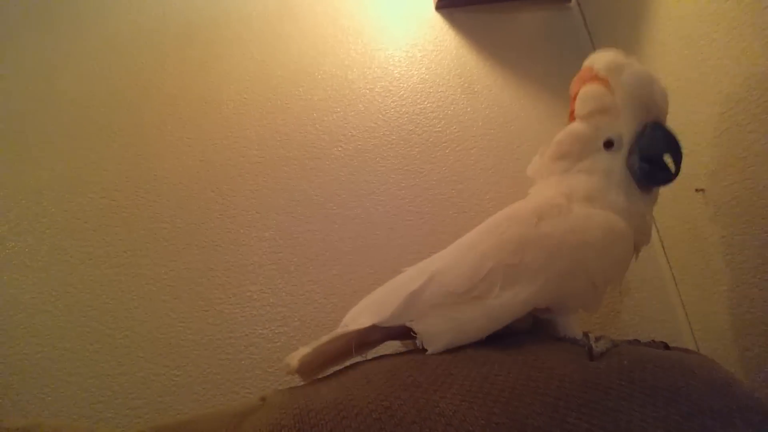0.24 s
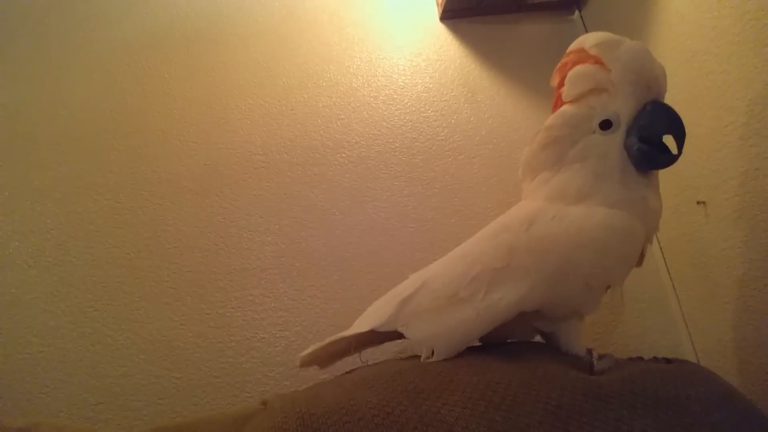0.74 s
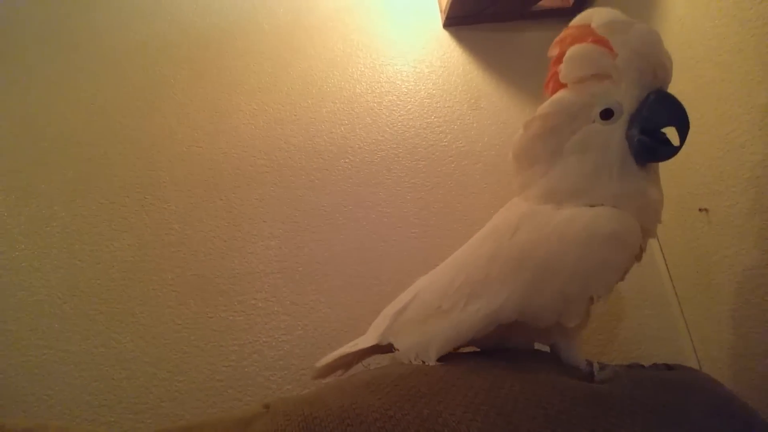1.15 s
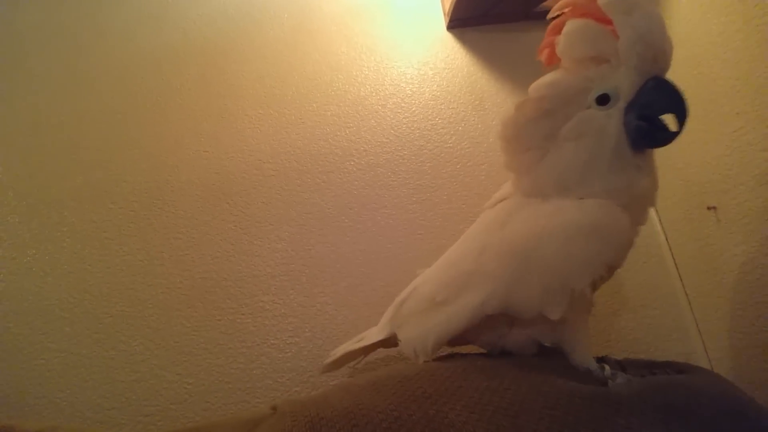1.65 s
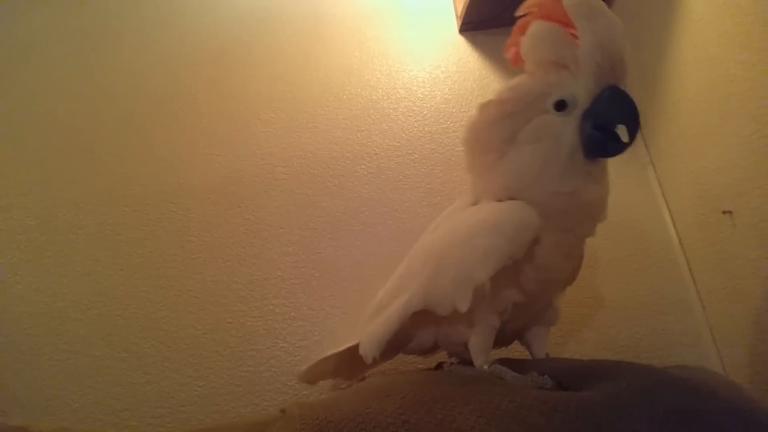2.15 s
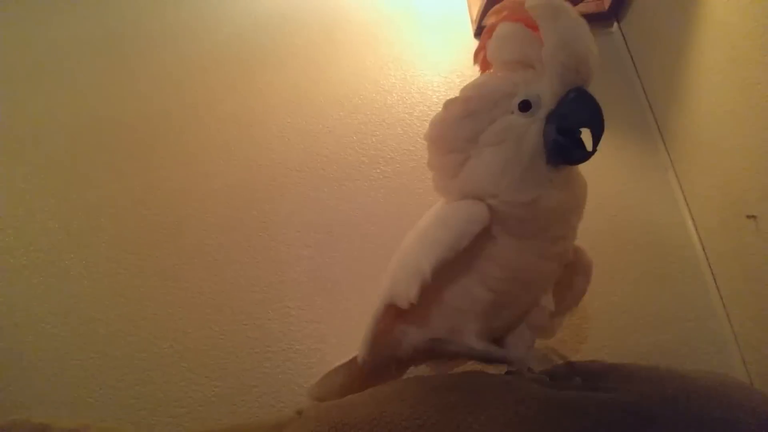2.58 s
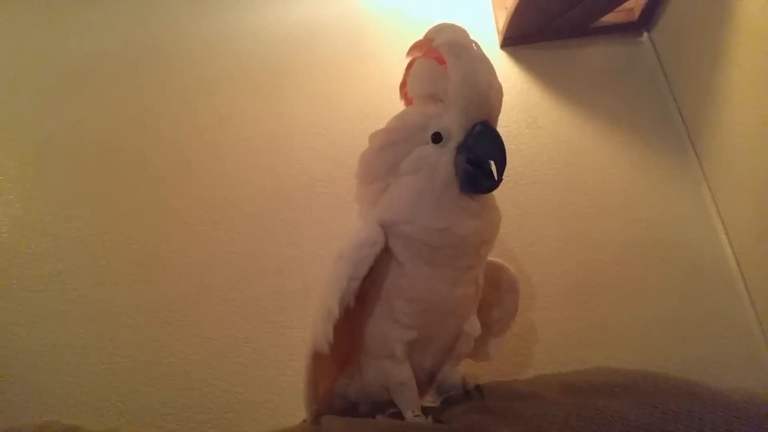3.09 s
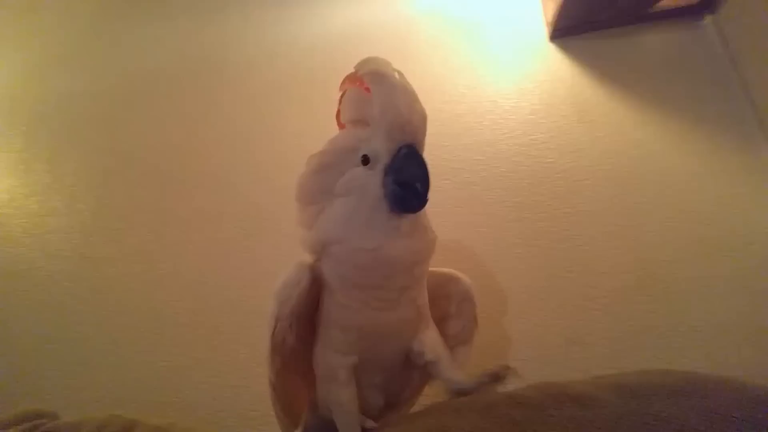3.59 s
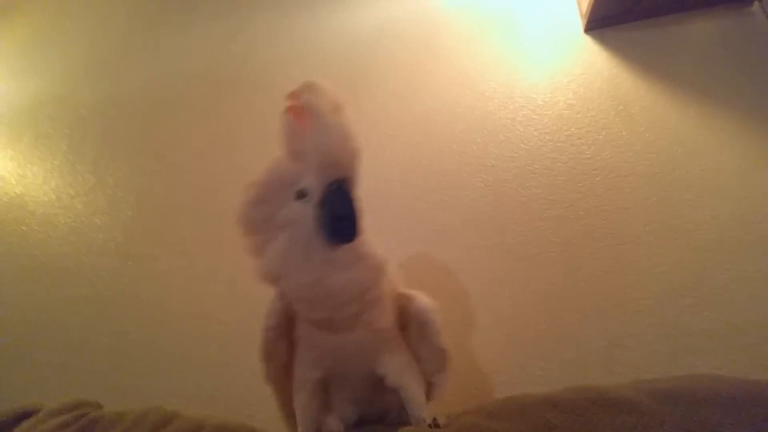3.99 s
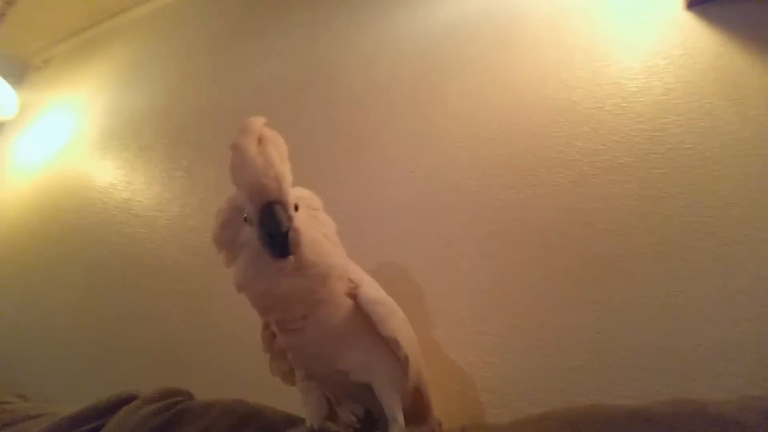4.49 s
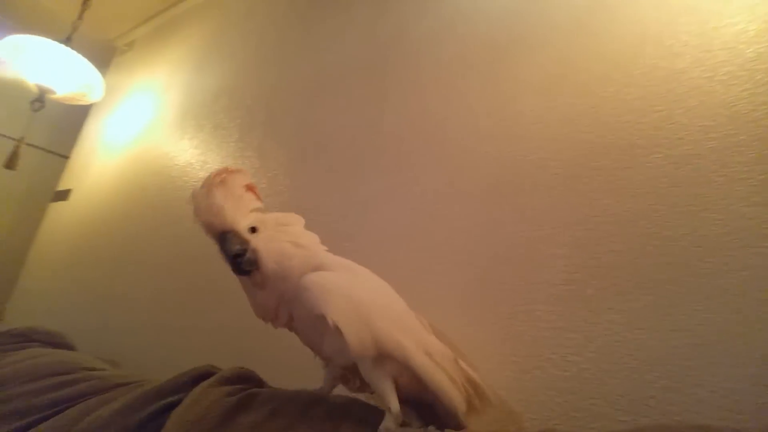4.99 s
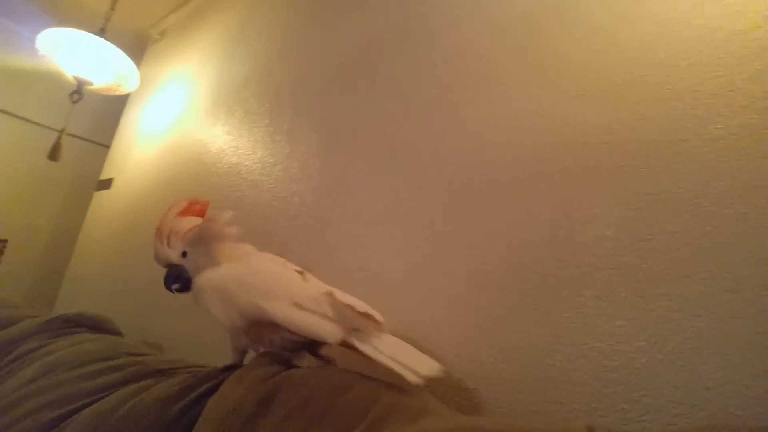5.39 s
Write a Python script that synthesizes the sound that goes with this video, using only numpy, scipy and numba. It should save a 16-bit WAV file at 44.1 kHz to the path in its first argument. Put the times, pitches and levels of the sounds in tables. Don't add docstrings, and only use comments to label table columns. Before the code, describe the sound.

A large cockatoo squawks close to a stereo microphone in a small living room with short, soft reflections. A low mains hum near 120 Hz, faint room wash and a barely audible high whine run throughout; the hum and wash sink when the bird is loud. A weaker squawk is already sounding at 0 s, then harsh bursts come at about 0.3, 0.7, 1.0, 1.5, 1.9, 2.2 and 2.6 s, each about 0.2 s, rough and throaty with hissy, bright beak edges. A soft breath falls near 0.5 s, a low pop near 0.7. From 3.0 to 4.2 s calls crowd and overlap, briefly locking onto hoarse, clearer pitches around 550-780 Hz. The sound moves from left to right around 3.6 s. A stronger hissed breath at 4.2 s and a loud pop at 4.36 precede more squawks at 4.4 and 4.8 s, and a quick cluster from 5.3 s, cut off mid-call at about 5.6.

```python
import sys
import numpy as np
from scipy import signal
from scipy.fft import next_fast_len
from scipy.io import wavfile
from scipy.ndimage import uniform_filter1d, map_coordinates
from numba import njit

SR = 44100
rng = np.random.default_rng(int(sys.argv[2]) if len(sys.argv) > 2 else 0)


def dump(signal):
    limited = np.clip(np.atleast_2d(signal).T, -1, 1)
    pcm = np.round(limited * 32767).astype(np.int16)
    wavfile.write(sys.argv[1], SR, pcm)


def voltage_ratio(level):
    return 10 ** (np.asarray(level, float) / 20)


N = 248724


def evened(x):
    return x / np.sqrt(np.mean(x ** 2) + 1e-20)


def steady(x):
    return x / np.sqrt(abs(uniform_filter1d(x ** 2, size=2600)) + 1e-12)


def read(points, hz):
    f, value = np.transpose(points)
    return np.interp(np.log(hz + 1), np.log(f + 1), value)


def curves(rows):
    s, *columns = np.transpose(rows)
    return [np.interp(np.arange(N) / SR, s, c) for c in columns]


@njit
def smooth(x, r):
    out, held = np.empty_like(x), 0j
    for n in range(len(x)):
        held = r[n] * held + (1 - r[n]) * x[n]
        out[n] = held
    return out


def resonate(x, hz, width):
    if np.ndim(hz) == 0:
        b, a = signal.iirpeak(hz, hz / width / 1.434, SR)
        return signal.sosfilt([[*b, *a]] * 2, x)
    turn = np.exp(2j * np.pi * np.cumsum(hz) / SR)
    r = np.exp(-np.pi * np.clip(width, 40, 4000) * 1.55 / SR) * np.ones(N)
    return 2 * (turn * smooth(smooth(x * turn.conj(), r), r)).real


def chain(x, modes):
    return sum((-1) ** k * voltage_ratio(db) * resonate(x, hz, width) for k, (hz, width, db) in enumerate(modes))


def hum():
    # (frequency [Hz], level [dB], wander [Hz])
    hum_lines = [(57.8, -23.5, 6.6), (120, -8, 1.2), (131, -32.5, 4), (554, -26.5, 7.5)]
    drift = [evened(uniform_filter1d(rng.standard_normal(N), size=4000)) for _ in hum_lines]
    lines = 0
    for (hz, db, wander), v in zip(hum_lines, drift):
        lines = lines + voltage_ratio(db) * np.sin(2 * np.pi * np.cumsum(hz + wander * v) / SR)
    return np.sqrt(2) * lines * voltage_ratio(np.array([[1.2], [-1.2]]))


def wash():
    # (frequency [Hz], density [dB per Hz])
    wash_colour = [(12, -40.5), (20, -29.5), (38, -19), (84, -8), (128, 4.5), (160, -8), (205, -11),
                   (263, -11.5), (337, -14.5), (555, -13), (713, -22), (2160, -30.5), (3460, -37.5),
                   (15000, -58.5)]
    # (frequency [Hz], correlation [-1 to 1])
    likeness = [(30, 0.97), (130, 0.88), (290, 0.97), (640, .5), (1400, 0.94), (15000, -0.067)]
    frames, hz = N // 512 + 5, np.fft.rfftfreq(2048, 1 / SR)
    a, b, c, d = rng.standard_normal((frames, 1025, 4)).T
    same = np.clip(read(likeness, hz), -1, 1)[:, None]
    left = a + 1j * b
    right = same * left + np.sqrt(1 - same ** 2) * (c + 1j * d)
    z = np.array([left, right]) * voltage_ratio(read(wash_colour, hz))[:, None]
    return voltage_ratio(-56) * evened(signal.istft(z, nperseg=2048, noverlap=1536)[1][:, :N])


def whine():
    whine_hz, level_db = 15734, -74
    phase = 2 * np.pi * whine_hz * np.arange(N) / SR + np.array([[0], [1.5]])
    return voltage_ratio(level_db) * np.sqrt(2) * np.sin(phase)


def pushes():
    # (start [s], length [s], effort [dB], attack [s], place of the peak [0-1])
    breath_pushes = [(-.05, .27, -16.5, 0.015, 0.3), (.265, 0.21, -10.5, 0.047, 0.6),
                     (0.7, 0.24, -10.5, 0.034, 0.3), (1.023, 0.21, -10.5, 0.035, 0.41),
                     (1.521, 0.26, -11, 0.027, 0.36), (1.935, 0.22, -10, 0.028, 0.53),
                     (2.225, 0.2, -13.5, 0.035, 0.47), (2.612, 0.24, -10.5, 0.061, 0.38),
                     (3.041, .2, -9.5, 0.032, 0.34), (3.214, 0.21, -10.5, 0.054, 0.44),
                     (3.41, .25, -10.5, 0.052, .35), (3.556, 0.19, -16, 0.038, 0.22),
                     (3.604, 0.19, -10, 0.059, .42), (3.733, 0.25, -13, 0.089, 0.56),
                     (3.884, 0.23, -16, 0.037, 0.7), (4.024, .17, -12.5, 0.029, 0.23),
                     (4.374, 0.19, -10.5, 0.064, .64), (4.544, 0.28, -17, 0.072, 0.65),
                     (4.829, .25, -13.5, 0.018, 0.37), (5.138, 0.2, -24.5, 0.015, 0.3),
                     (5.272, 0.19, -12, 0.077, .64), (5.364, 0.18, -12, 0.029, 0.22),
                     (5.528, 0.18, -14.5, 0.042, 0.46)]
    # (lower resonance [Hz], upper resonance [Hz], upper level [dB],
    # mouth level [dB], beak brightness [dB])
    vowels = [(975, 1450, -5, -1.5, -15.5), (1023, 1320, 0.5, -7.5, -19.5), (1030, 1350, 1.5, -5, -18.5),
              (1003, 1374, 2.5, -5, -23.5), (1010, 1270, 7.5, -4, -19.5), (1078, 1330, -2.5, -20, -19),
              (976, 1320, -3, -7, -18), (934, 1413, -1.5, -3.5, -18), (1026, 1260, -9.5, -9, -16),
              (960, 1310, 1.5, -7.5, -15), (1047, 1340, -3.5, -9.5, -16), (760, 1200, 9.5, -16.5, -2.5),
              (830, 1450, 13, -13.5, -11.5), (855, 1350, 7.5, -23.5, -15), (865, 1330, 6, -19.5, -18.5),
              (970, 1300, 6, -5, -17), (926, 1340, 3, -9, -16), (820, 1280, 7, -12, -19),
              (830, 1330, 10, -18.5, -22), (890, 1240, 8, -34, -18.5), (754, 1212, 6.5, -6, -8),
              (855, 1180, 6, 1, -20.5), (880, 1300, 4.5, -17.5, -21)]
    # (chest level [dB], side of the beak [dB], rise of the upper level [dB],
    # glide of the lower resonance [share])
    shades = [(-34, -0.5, 13, -0.14), (-32, -0.5, 9, 0.073), (-23, -5.5, 11, 0.18),
              (-32, -0.5, -3.5, -0.17), (-29.5, -5.5, 3, 0.14), (-20.5, -4.5, 9.5, 0),
              (-33.5, -15.5, 17, .02), (-29.5, -2, 12.5, -0.13), (-34.5, -4.5, 14, 0.12),
              (-12.5, -9, 10.5, -0.23), (-15, 1, -8, 0.061), (-23, 16, 6.5, 0), (-23, -4, 1.5, 0),
              (-13.5, 5.5, 3.5, 0), (-18.5, 2, -0.5, 0), (-20.5, -8, 1.5, 0), (-15, -1, 13, 0.033),
              (-9, 0.5, 15, 0.0041), (-26.5, -4, -16, -.08), (-17.5, 4, 18, 0.025), (-35.5, -6, 1.5, 0),
              (-24.5, -3, 5, 0.067), (-17, 3, -1.5, -0.05)]
    tip_aim = [1, 1, -3, 7, 3, -2.5, 1, -2, -2, -1, 1, 0, 0, -3, 0, 1, 0, 1, 1, 0, 5.5, 6, 3]
    silent_db, opened_db, sagged_db, spent_db = -31.5, -4.5, -6.5, -38.5
    release_s = 0.066
    t = np.arange(0, N + 64, 64) / SR
    drops = []
    for s, length, _, attack, peak in breath_pushes:
        knots = np.sort([0, attack, peak * length, length - release_s, length])
        drops.append(np.interp(t - s, knots, [silent_db, opened_db, 0, sagged_db, spent_db], -150, -150))
    start, length, effort_db = np.transpose(breath_pushes)[:3, :, None]
    power = voltage_ratio(2 * (effort_db + drops))
    share = power / power.sum(0)
    progress = np.clip((t - start) / length, 0, 1)
    total_db = 10 * np.log10(power.sum(0))
    course = [t, total_db, (share * drops).sum(0), (share * progress).sum(0)]
    tone = [share.T @ vowels, share.T @ shades, share.T @ tip_aim]
    return curves(np.column_stack(course + tone))


def locking():
    # (start [s], end [s], first pitch [Hz], last pitch [Hz], harmonic the throat tunes to [number])
    locks = [
        (2.014, 2.067, 604, 610, 2),
        (3.297, 3.335, 640, 637, 2),
        (3.826, 3.848, 556, 553, 2),
        (5.35, 5.385, 593, 618, 1),
    ]
    # (start [s], end [s], first pitch [Hz], last pitch [Hz], chaos [0-1])
    hoarse = [
        (3.53, 3.6, 682, 712, .3),
        (3.601, 3.67, 712, 787, .27),
        (3.671, 3.75, 787, 729, .3),
        (3.785, 3.81, 560, 557, .7),
        (3.86, 3.96, 553, 540, .42),
        (3.961, 4.12, 540, 552, .45),
        (4.47, 4.52, 630, 620, .16),
        (4.88, 5.01, 680, 663, .42),
        (5.56, 5.64, 650, 652, .38),
    ]
    locked_chaos, entry_s, exit_s = .012, .02, .006
    t = np.arange(N) / SR
    spells = [(*row[:4], locked_chaos, row[4]) for row in locks]
    spells = sorted(spells + [(*row, 1) for row in hoarse])
    chaos, harmonic, glide = np.ones(N), np.ones(N), []
    for start, end, first, last, calm, k in spells:
        hold = np.minimum(1 + (t - start) / entry_s, 1 + (end - t) / exit_s)
        spell = calm ** np.clip(hold, 0, 1)
        harmonic = np.where(spell < chaos, k, harmonic)
        chaos = np.minimum(chaos, spell)
        glide += [(start, first), (end, last)]
    (hz,) = curves(glide)
    return hz, chaos, harmonic


def syrinx(hz, chaos):
    stray, uneven, air = .45, .5, .3
    turns = np.cumsum(hz) / SR
    beat = np.interp(np.arange(1, int(turns[-1])), turns, np.arange(N))
    off, size = rng.standard_normal((6000, 2))[:len(beat)].T
    off = evened(signal.lfilter([1], [1, -.6], off))
    here = beat.astype(int)
    at = np.clip(beat + stray * chaos[here] * off * SR / hz[here], 9, N - 10)
    taps = at.astype(int)[:, None] + np.arange(-8, 9)
    away = taps - at[:, None]
    shape = np.sinc(away) * np.cos(np.pi * away / 18) ** 2
    sized = shape * (1 + uneven * chaos[here] * size)[:, None]
    pulses = np.bincount(taps.ravel(), sized.ravel(), N)
    pulses = evened(pulses - pulses.mean())
    jet = (chaos + 0.075) * rng.standard_normal(N)
    return pulses + air * jet, (1 - .6 * chaos) * pulses + jet


def saturate(x):
    size = abs(signal.hilbert(x, next_fast_len(N))[:N])
    return x / (size + 0.11) ** 0.52


def throat_voice(drive, chest, lower, upper, mouth_db, shut_db):
    # (frequency [Hz], width [Hz], level [dB])
    mouth_modes = [(1672, 85, -17.5), (2414, 605, -1.5)]
    # (frequency [Hz], width [Hz], level [dB])
    body_modes = [(1250, 750, -9), (3300, 700, -30)]
    throat = chain(drive, [chest, lower, upper])
    around = voltage_ratio(mouth_db) * chain(drive, mouth_modes) + chain(drive, body_modes)
    throat = saturate(steady(throat + voltage_ratio(shut_db) * around))
    throat = signal.sosfilt(signal.butter(2, 2900, fs=SR, output="sos"), throat)
    return signal.sosfilt(signal.butter(8, 465, "high", fs=SR, output="sos"), throat)


def beak_voice(hiss, drop_db, side_db, tip_db):
    # (frequency [Hz], width [Hz], level [dB])
    beak_bands = [(4200, 800, -15), (7200, 800, -13), (8200, 450, -20)]
    # (frequency [Hz], width [Hz], level [dB])
    tip_bands = [(9340, 880, -26.5), (10680, 310, -19.5), (11980, 330, -29.5), (13600, 450, -30)]
    # (time [s], frequency [Hz])
    main_path = [(0, 5370), (1.7, 5440), (2, 5080), (3.1, 5420), (4, 5240), (4.4, 4980), (4.9, 5270),
                 (5.4, 4920), (5.64, 5150)]
    # (frequency [Hz], width [Hz])
    side_pockets = [(6350, 100), (9100, 1600)]
    tip_drift, turning_db = .045, 4.5
    (main_hz,) = curves(main_path)
    main_hz = main_hz * (1 + 0.0031 * np.maximum(drop_db, -30))
    bands = len(beak_bands + 2 * tip_bands)
    swings = curves(np.column_stack([np.arange(64) * .09, rng.standard_normal((64, bands))]))
    tip = []
    for (hz, width, db), drift in zip(tip_bands, swings[::-1]):
        tip.append((hz * (1 + tip_drift * drift), width, db + tip_db))
    turned = []
    for (hz, width, db), swing in zip(beak_bands + tip, swings):
        turned.append((hz, width, db + turning_db * swing))
    side_hz, side_width, level_db = turned[0]
    beak = chain(hiss, [(side_hz, side_width, level_db + side_db), (main_hz, 523, 0)] + turned[1:])
    for hz, width in side_pockets:
        beak = signal.lfilter(*signal.iirnotch(hz, hz / width, SR), beak)
    return beak


def squawks():
    # (time [s], frequency [Hz])
    pocket_path = [(.35, 3200), (.8, 4050), (1.6, 3460), (2.3, 4000), (3.5, 4050), (3.63, 3170),
                   (4.1, 4500), (4.6, 4020), (5.22, 3240), (5.36, 3940)]
    favour = [16.5, -17]
    loose_width_hz, tuned_width_hz, tuned_chaos = 174.4, 95, .25
    (effort_db, drop_db, progress, lower_hz, upper_hz, upper_db, mouth_db, bright_db,
     chest_db, side_db, rise_db, glide, tip_db) = pushes()
    chest_hz, chaos, harmonic = locking()
    late = progress - .5

    tuned = uniform_filter1d(np.clip(2 - chaos / tuned_chaos, 0, 1), size=400)
    lower_hz = lower_hz * (1 + glide * late) * (1 - tuned) + tuned * harmonic * chest_hz
    upper_hz = upper_hz * (1 + .08 * late) * (1 - tuned) + tuned * (harmonic + 1) * chest_hz
    upper_db = (upper_db + rise_db * late) * (1 - tuned) + tuned * np.where(harmonic > 1, favour[1], favour[0])
    width = loose_width_hz + tuned * (tuned_width_hz - loose_width_hz)
    mouth_db = mouth_db + 1.47 * np.maximum(drop_db, -20)
    bright_db = bright_db - 0.5 * late - 0.5 * (1 - chaos) ** 2

    drive, hiss = syrinx(chest_hz, chaos)
    top_db = np.maximum(upper_db, 0)
    shut_db = 0.38 * np.clip(effort_db + 17.5, -40, 0)
    lower_hz = lower_hz * voltage_ratio(0.31 * shut_db)
    chest = (chest_hz, 170, chest_db - 1.8 * shut_db)
    lower = (lower_hz, width, -top_db)
    upper = (upper_hz, width, upper_db - top_db + 0.12 * shut_db)
    throat = throat_voice(drive, chest, lower, upper, mouth_db, shut_db)
    beak = beak_voice(hiss, drop_db, side_db, tip_db)
    (pocket_hz,) = curves(pocket_path)
    throat = throat - resonate(throat, pocket_hz, 400)
    beak = beak - resonate(beak, pocket_hz, 400)
    return voltage_ratio(effort_db) * steady(throat), voltage_ratio(effort_db + bright_db) * steady(beak), effort_db


def gain_ride(effort_db):
    # (time [s], level [dB])
    open_level = [(0, -35.5), (1.5, -38), (2, -40.5), (5, -38), (5.64, -34)]
    duck_above_db, duck_share, recover_db_per_s = -22.5, 0.21, 41.5
    creep = np.arange(N) * recover_db_per_s / SR
    held_db = np.maximum.accumulate(effort_db + creep) - creep
    over_db = np.maximum(held_db - duck_above_db, 0)
    return curves(open_level)[0] - duck_share * uniform_filter1d(over_db, size=2000)


def breaths():
    # (start [s], end [s], level [dB])
    drawn = [
        (0.452, 0.638, -59.5),
        (2.405, 2.5, -70),
        (2.874, 2.981, -65.5),
        (4.18, 4.314, -53.5),
    ]
    t, air = np.arange(N) / SR, rng.standard_normal(N)
    air = evened(chain(air, [(1900, 1200, 7.5), (4470, 600, -7.5), (5800, 820, 14.5), (7230, 3600, -5.5)]))
    return air * sum(voltage_ratio(db) * np.sin(np.pi * np.clip((t - a) / (b - a), 0, 1)) ** .6 for a, b, db in drawn)


def clicks():
    # (time [s], peak [dB], throat ring [Hz], beak tick [dB])
    pops = [
        (0.677, -32.5, 552, -30),
        (1.911, -42.5, 1150, -3.5),
        (3.013, -38, 780, -23),
        (4.361, -25.5, 720, -5.5),
    ]
    out, t = np.zeros(N + 900), np.arange(900) / SR
    for s, db, hz, tick_db in pops:
        ring = np.cos(2 * np.pi * hz * t) * np.exp(-t / 0.0035)
        tick = voltage_ratio(tick_db) * np.sin(2 * np.pi * 4700 * t) * np.exp(-t / 0.001)
        out[round(s * SR):][:900] += voltage_ratio(db) * (ring + tick) * np.minimum(t / .0004, 1)
    return out[:N]


def ports(low, high):
    # (time [s], distance [m])
    walk = [(.1, 0.062), (.36, 0.087), (2.04, .118), (2.32, 0.14), (2.72, 0.16), (3.13, 0.19), (3.6, 0.205),
            (4, 0.23), (4.7, .27), (5.45, 0.32)]
    front_m, cross_m, wall_db = 0.2075, 0.053, -8.5
    (wall_m,) = curves(walk)
    left_side = -np.tanh((wall_m - front_m) / cross_m)
    trip_ms = 2 * wall_m / .343
    lag = 0.67 + 9.85 * left_side
    shade_db, out = 6.6 + 9.4 * left_side, []
    for side, wall_ms in ((0.6, trip_ms), (-1.11, 0.18 + 1.242 * trip_ms)):
        heard = low + voltage_ratio(side * shade_db / 2) * high
        at = np.arange(N) + side * lag / 2
        direct, echo = map_coordinates(heard, [[at, at - wall_ms * SR / 1e3]], order=3)
        out.append(direct + voltage_ratio(wall_db) * echo)
    return np.array(out) * voltage_ratio(np.array([[.5], [-.5]]))


def room(x):
    # (frequency [Hz], t60 [s])
    decay = [(300, 0.26), (1200, 0.17), (4000, 0.14), (10000, 0.12)]
    # (left delay [ms], left level [dB], right delay [ms], right level [dB])
    near_echoes = [(2.1, -16, 3.1, -19.5), (6.7, -38.5, 5.2, -5.5), (11.3, -15.5, 7, -29.5)]
    late_t60_s, late_db = .7, -30
    taps = np.zeros((2, SR // 2))
    at = np.arange(500, SR // 2 - 20, 20) + rng.integers(0, 20, (2, (SR // 2 - 501) // 20))
    np.put_along_axis(taps, at, rng.choice([-1., 1.], at.shape), 1)
    hz, t, z = signal.stft(taps, SR, nperseg=256)
    near = voltage_ratio(-60 * t / read(decay, hz)[:, None])
    house = voltage_ratio(late_db - 60 * t / late_t60_s) / (1 + (hz[:, None] / 2500) ** 2)
    tail = signal.istft(z * (near + house), SR, nperseg=256)[1]
    tail *= voltage_ratio(-16) / np.linalg.norm(tail[0])
    for left_ms, left_db, right_ms, right_db in near_echoes:
        tail[0, round(left_ms * SR / 1e3)] += voltage_ratio(left_db)
        tail[1, round(right_ms * SR / 1e3)] += voltage_ratio(right_db)
    return signal.fftconvolve(x, tail, axes=1)[:, :N]


def scene():
    throat, beak, effort_db = squawks()
    bird = ports(voltage_ratio(1.32) * throat + clicks(), voltage_ratio(-0.12) * beak + breaths())
    background = voltage_ratio(gain_ride(effort_db)) * (hum() + voltage_ratio(44) * wash())
    return bird + room(bird) + background + whine()


def band_limit(x):
    return signal.sosfilt(signal.butter(12, 15870, fs=SR, output="sos"), x)


def record(dry):
    ceiling = 1.02
    excess = dry - np.tanh(dry / ceiling) * ceiling
    squeezed = signal.sosfilt(signal.butter(2, 300, "high", fs=SR, output="sos"), excess)
    return band_limit(voltage_ratio(-0.06) * (dry - squeezed))


dry = scene()
out = record(dry)
dump(out)
```